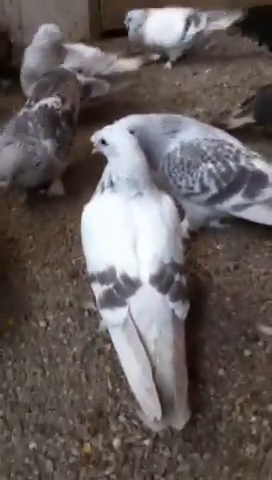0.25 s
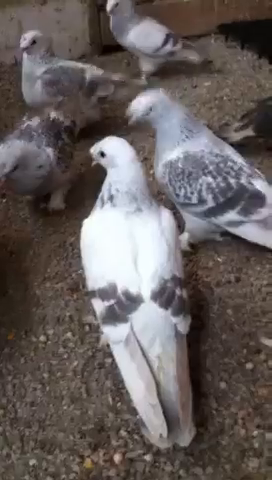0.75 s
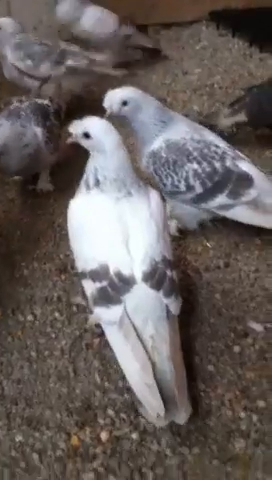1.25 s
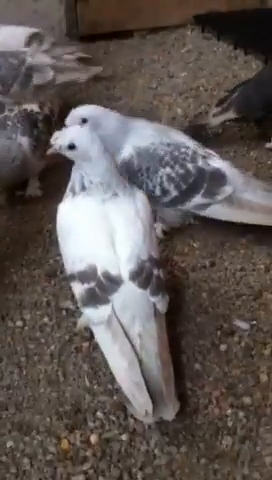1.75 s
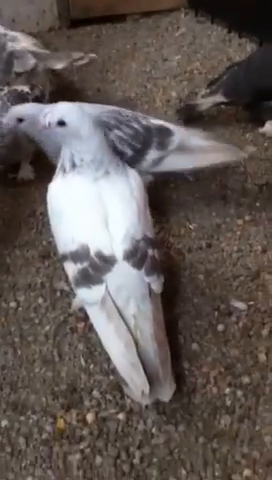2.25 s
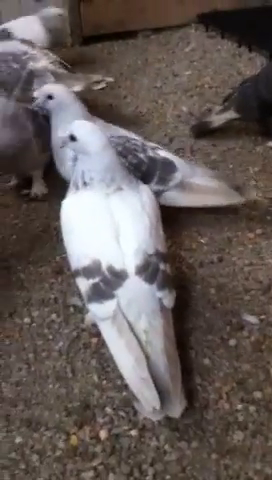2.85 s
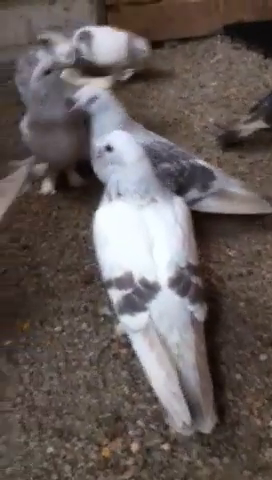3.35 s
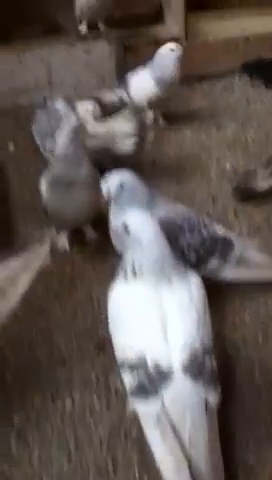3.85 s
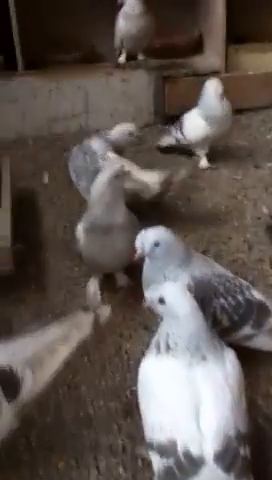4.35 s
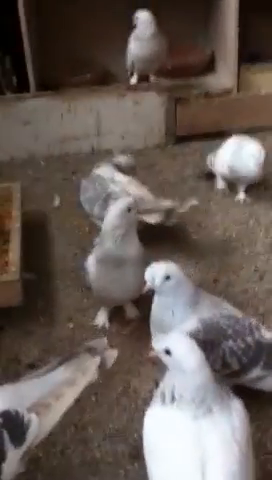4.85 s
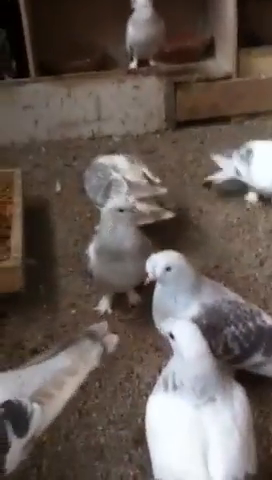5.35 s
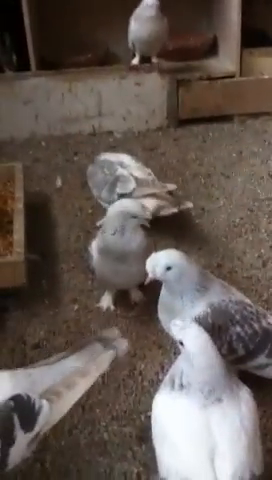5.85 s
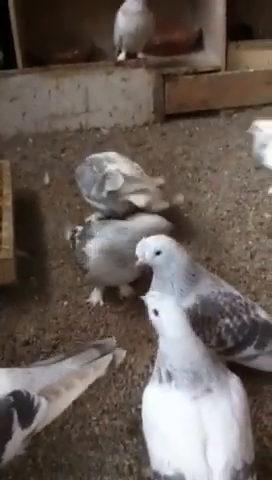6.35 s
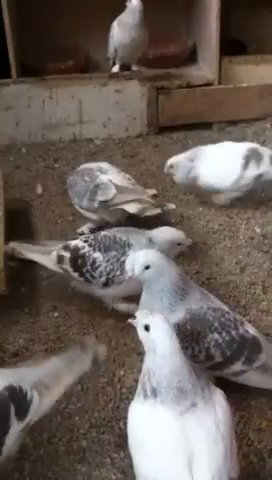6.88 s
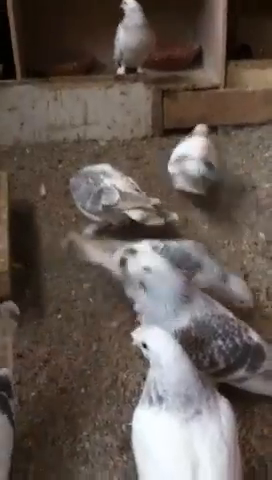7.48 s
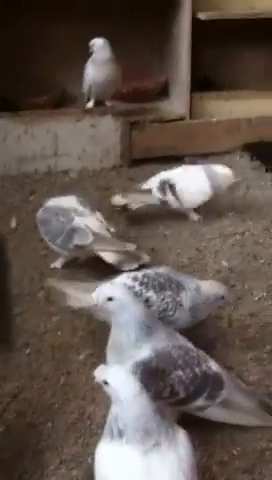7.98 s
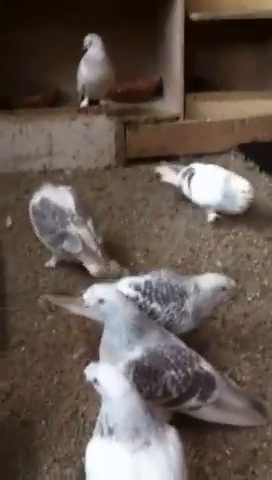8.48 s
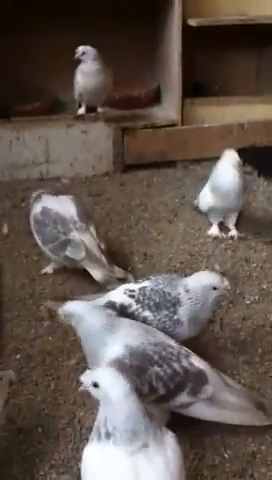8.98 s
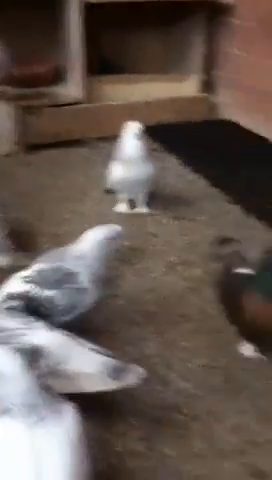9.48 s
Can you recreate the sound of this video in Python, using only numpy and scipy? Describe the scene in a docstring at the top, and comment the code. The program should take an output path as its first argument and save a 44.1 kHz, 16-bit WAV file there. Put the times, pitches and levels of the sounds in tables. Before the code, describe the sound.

A pigeon's low hum, around 200 Hz with a stronger octave above, is already sounding at the start and swells until 0.45 s. From 0.53 to 1.24 s one bird claps its wings seven times, evenly, about nine a second: loud, dry, crackling slaps with soft thumps and brief board echoes, amid feather swish. Quiet pops, clucks and faint metal ticks follow from 1.4 s, leading to a hum at 2.1-2.7 s, more bubbling, and another hum at 3.4-3.9 s. A lull until 5.2 s holds only small grit ticks and a faint feather brush. Rolling resumes, with a short hum and faint hoarse croak near 5.9 s, then stronger, rougher, gulping coos at 6.1-6.5, 7.1-7.7 and 8.4-9.0 s, joined by throat pops and clucks between. Feather rustle and a few ticks end it over a quiet, patchy wash.

```python
"""Pigeons coo in a wooden loft: rolls of short throat pops swell into long hummed notes that turn rough.
The hum is a few sine harmonics with half lines between them; pops, clucks and a croak are short rings and noise.
One bird claps its wings seven times, made of noise and clusters of snaps with a soft thump ahead of each.
Feet, beaks and feathers tick and rustle on grit and a metal tray, as coloured snaps, hiss and ringing modes.
A quiet, patchy wash of noise lies behind it all, and echoes off the boards follow most of the sounds."""
import sys
import numpy as np
from scipy import signal
from scipy.io import wavfile
from scipy.ndimage import uniform_filter1d

SR = 44100
rng = np.random.default_rng(int(sys.argv[2]) if len(sys.argv) > 2 else 0)


def waveform_to_disk(signal):
    """Save audio, clipped to [-1, 1], as 16-bit WAV at the path in sys.argv[1]."""
    frames = np.transpose(np.atleast_2d(signal))
    scaled = np.clip(frames, -1, 1) * 32767
    samples = np.round(scaled).astype(np.int16)
    wavfile.write(sys.argv[1], SR, samples)


def decibels_to_gain(level_db):
    """Convert a level in decibels to a linear amplitude gain (20 dB per decade)."""
    exponent = np.asarray(level_db, float) / 20
    return 10 ** exponent


N = 428652
CHEST_HZ = 223.9  # the pitch at which the chest sounds strongest


def evened(x):
    """Scales to rms 1."""
    return x / np.sqrt(np.mean(x ** 2) + 1e-20)


def read(points, hz):
    """Reads a table on a log-frequency axis."""
    f, value = np.transpose(points)
    return np.interp(np.log(hz + 1), np.log(f + 1), value)


def add(mix, s, sound):
    """Mixes a sound in at time s."""
    part = mix[max(round(s * SR), 0):][:len(sound)]
    part += sound[:len(part)]


def colour(x, spectrum, tilt_db=0):
    """Causal filter of energy 1 with the given spectrum, tilted about 4 kHz by dB per octave above 800 Hz."""
    hz = abs(np.fft.fftfreq(2048, 1 / SR))
    octaves = np.log2(np.maximum(hz, 800) / 4000)
    log_gain = np.log(decibels_to_gain(np.maximum(read(spectrum, hz) + tilt_db * octaves, -100)))
    # the phase that goes with this gain puts the energy as early as possible
    response = np.exp(np.conj(signal.hilbert(log_gain)))
    taps = np.fft.ifft(response).real[:1024]
    return signal.oaconvolve(x, taps / np.linalg.norm(taps))


def wander(size, s):
    """Random curve of rms 1, smoothed twice over s seconds."""
    width = max(round(s * SR), 1)
    smooth = uniform_filter1d(rng.standard_normal(size), width)
    return evened(uniform_filter1d(smooth, width))


def puff(t, rise_s, fall_s):
    """Soft rise, exponential fall, top near 1."""
    t = np.maximum(t, 0)
    shape = (1 - np.exp(-(t / rise_s) ** 2)) * np.exp(-t / fall_s)
    return shape / (shape.max() + 1e-9)


def along(tables, column=1, quiet=-110):
    """Joins curve tables over the whole time, with the quiet value between them."""
    t, out = np.arange(N) / SR, np.full(N, float(quiet))
    for rows in tables:
        rows = np.array(rows)
        inside = (t >= rows[0, 0]) & (t < rows[-1, 0])
        out[inside] = np.interp(t[inside], rows[:, 0], rows[:, column])
    return out


def crackle(spread_s, rise_s, per_s):
    """A cluster of snaps of uneven size that gathers fast and thins out."""
    t = np.arange(1, 2600) / SR
    draws = rng.random((len(t), 3))
    happens = draws[:, 0] < per_s / SR
    snaps = happens * np.sign(draws[:, 1] - .5) * -np.log(draws[:, 2] + 1e-2)
    gather = 1 - 0.85 * np.exp(-t / rise_s)
    fade = np.exp(-(t / max(spread_s, .001)) ** 2.1)
    return snaps * gather * fade


def loft(x, level_db):
    """Direct sound plus sparse reflections off the boards, each band dying at its own speed."""
    # how long the loft rings: (f/Hz, time to fall by 60 dB/s)
    ringing = [(100, 0.1), (400, 0.3), (1500, 0.21), (5000, 0.14), (15000, 0.054)]
    taps = np.zeros(SR // 2)
    at = np.arange(120, len(taps) - 20, 12)
    taps[at + rng.integers(0, 12, len(at))] = rng.choice([-1., 1.], len(at))
    hz, t, z = signal.stft(taps, SR, nperseg=256)
    fading = z * decibels_to_gain(-60 * t / read(ringing, hz)[:, None])
    tail = signal.istft(fading, SR, nperseg=256)[1]
    heard = decibels_to_gain(level_db) * signal.fftconvolve(x, tail / np.linalg.norm(tail))
    add(heard, 0, x)
    return heard[:N]


def air():
    """Distant outdoor wash and microphone hiss, slightly patchy: noise shaped in frequency and time."""
    # colour of the wash: (f/Hz, relative level per Hz/dB)
    wash = [(15, -46.5), (25, -11), (48, -37.5), (118, -2), (220, 0.5), (457, -5.5), (1060, -6),
            (2460, -21), (5570, -22.5), (10700, -26.5), (15200, -29), (16500, -37)]
    frames, hz = N // 256 + 5, np.fft.rfftfreq(1024, 1 / SR)
    a, b, patches = rng.standard_normal((frames, 513, 3)).T
    patches = evened(uniform_filter1d(uniform_filter1d(patches, 12, 0), 14, 1))  # rms 1 dB
    z = (a + 1j * b) * decibels_to_gain(read(wash, hz)[:, None] + patches)
    noise = signal.istft(z, nperseg=1024, noverlap=768)[1][:N]
    return decibels_to_gain(-56.5) * evened(noise)


def rustle():
    """Slightly grainy feather hiss, blended between a broad swish and a thin rasp."""
    # feathers brushing, one curve a rustle: (t/s, level/dB, share of the thin rasp 0-1)
    brushes = [
        [(0.415, -40.5, 0.02), (1.001, -32, 0.07), (1.42, -53, 0.14)],
        [(2.72, -69, 0.35), (2.738, -51, 0.2), (2.87, -63, 0.56)],
        [(5.03, -64, 0.5), (5.138, -51.5, 0.63), (5.3, -64, 0.45)],
        [(7.24, -52, 0.79), (7.428, -67.5, 0.6), (7.45, -67.5, 0.5)],
        [(7.66, -52, 0.44), (7.83, -59, 0.13), (7.9, -62.5, 0.3)],
        [(9.26, -70.5, 0.4), (9.29, -48, 0.03), (9.54, -61.5, 0.5)],
    ]
    # colour of whole wings swishing: (f/Hz, relative level per Hz/dB)
    wing_colour = [(120, -35), (200, -4.5), (394, 0), (548, -1.5), (749, -7), (8900, -24), (16000, -28.5)]
    # colour of quills rasping: (f/Hz, relative level per Hz/dB)
    quill_colour = [(1060, -40.5), (1800, -2.5), (4170, -2), (6590, -12.5), (13200, -15.5), (16000, -17.5)]
    grains = rng.standard_normal(N) * decibels_to_gain(1.5 * wander(N, .006))
    share = np.clip(along(brushes, column=2, quiet=0), 0, 1)
    swish = evened(colour(grains, wing_colour)[:N])
    rasp = evened(colour(grains, quill_colour)[:N])
    level = uniform_filter1d(decibels_to_gain(along(brushes)), 600)
    return ((1 - share) * swish + share * rasp) * level


def ticks(count=20):
    """Claws and beaks shift a few grains of grit, each tick a burst of snaps; faint far ones fall at random."""
    # the clearest steps and pecks on the grit: (t/s, level near the peak/dB, tilt/dB per octave)
    steps = [(0.1918, -42.5, 1.5), (0.2858, -43.5, -4), (0.425, -30.5, 2), (0.947, -25.5, 11),
             (1.4383, -37.5, 0.7), (1.5268, -42.5, 0.1), (2.1924, -46, 0), (2.391, -49, -10.5),
             (2.7322, -45.5, -3), (3.1702, -45.5, 1), (4.0188, -48, 5), (4.3151, -47, -1),
             (4.5042, -51, -1), (4.595, -40.5, 3), (5.306, -44.5, 2), (5.3487, -46, -2),
             (5.5532, -45, -2.5), (5.893, -47, -10.5), (6.2615, -34.5, 1.3), (6.4884, -48.5, 0),
             (6.592, -34.5, -3), (7.0258, -47, 0), (7.232, -39.5, -4), (7.2626, -44.5, 3),
             (7.34, -47.5, -3), (7.5206, -41, -0.5), (7.633, -41, -1.5), (7.7033, -41.5, 0.1),
             (8.36, -54.5, -6.5), (9.282, -38.5, -3.5), (9.365, -45.5, -13.5), (9.394, -48, -1.5),
             (9.663, -35, 13.5)]
    # colour of the grit: (f/Hz, relative level per Hz/dB)
    grit = [(530, -32.5), (900, -6.5), (3130, -4), (5170, -2.5), (9400, -8), (14800, -19.5), (16100, -24.5),
            (16700, -61)]
    out = np.zeros(N)
    when = rng.random(count) * N / SR
    size, tilt = rng.standard_normal((count, 2)).T
    faint = zip(when, -55.5 + size, 5.5 + 5 * tilt)  # same columns as the steps
    for s, db, tilt_db in steps + list(faint):
        tick = colour(crackle(.007, 0.00074, per_s=6100), grit, tilt_db)
        add(out, s, decibels_to_gain(db) * tick / np.percentile(abs(tick[:400]), 99))
    return out


def tray():
    """A beak or claw brushes a thin metal tray: a scraping touch sets a few of its modes ringing."""
    # touches of the tray: (t/s, peak level/dB)
    taps = [(1.4387, -50), (1.4686, -47), (1.5299, -51), (2.1916, -51), (2.2248, -62), (2.9113, -53.5),
            (3.171, -53)]
    # ringing modes of the tray: (f/Hz, relative level/dB, time to fall by 60 dB/s)
    modes = [(2380, -5, .02), (2860, -2, .025), (4170, 0, .02), (4330, -3, .02), (5960, -7, .018)]
    out, t = np.zeros(N), np.arange(6000) / SR
    ring = sum(decibels_to_gain(db - 60 * t / t60) * np.sin(2 * np.pi * hz * t) for hz, db, t60 in modes)
    for s, db in taps:
        tap = signal.fftconvolve(crackle(.012, 0.0019, per_s=3300), ring)
        add(out, s, decibels_to_gain(db) * tap / abs(tap).max())
    return out


def wings():
    """Feathers slap one after another; pushed air thumps just before; the bird moves, so the echoes change."""
    # wing claps: (t/s, level of the slap near its peak/dB, basic spread of the slaps/s, tilt/dB per octave)
    claps = [(0.5347, -4.5, 0.011, 0.6), (0.6496, -5, 0.0087, -0.3), (0.7613, -2.5, 0.009, 0.34),
             (0.876, -6.5, 0.0068, 0.1), (0.9916, -3, 0.0083, 0.86), (1.112, -5, 0.0094, 1.44),
             (1.2371, -8, 0.0084, 0.9)]
    # colour of a slap: (f/Hz, relative level per Hz/dB)
    slap_colour = [(35, -46), (60, -17.5), (477, -2), (1870, -3), (2050, -3), (3210, -2.5), (4790, -5.5),
                   (13200, -11), (15600, -17.5), (16700, -35.5)]
    out, t = np.zeros(N), np.arange(3000) / SR
    for s, db, spread, tilt_db in claps:
        # air squeezed out between the wings
        rush = 0.28 * rng.standard_normal(2599) * puff(t[:2599], .4 * spread, 0.011)
        snaps = crackle(1.25 * spread, 0.5 * spread, per_s=5000)
        slap = colour(snaps + rush, slap_colour, tilt_db)
        slap = decibels_to_gain(db) * slap / np.percentile(abs(slap[:600]), 99.5)
        add(out, s - .002, loft(slap, -4.5))
        # the hollow between the closing wings
        hollow_hz = 310 * rng.uniform(.93, 1.07)
        hollow = np.sin(2 * np.pi * hollow_hz * t) * puff(t, 0.0042, 0.012)
        add(out, s - .01, decibels_to_gain(db - 20) * hollow)
        thump = wander(len(t), 0.001) * puff(t, 0.011, 0.0027)
        add(out, s - .012, decibels_to_gain(db - 30) * thump)
    return out


def croak():
    """A hoarse breathy rasp from one throat: uneven puffs of noise through a wide resonance."""
    out, size = np.zeros(N), round(0.116 * SR)
    puffs = rng.standard_normal(size) * decibels_to_gain(4.0 * wander(size, 0.0031))
    band = signal.butter(2, [0.57 * 1500, 1.06 * 1500], "band", fs=SR, output="sos")
    rasp = evened(signal.sosfilt(band, puffs))
    shape = puff(np.arange(size) / SR, .02, 0.043) * signal.windows.tukey(size, .1)
    add(out, 5.92, decibels_to_gain(-56) * rasp * shape)
    return out


def clucks():
    """Short hoarse tones that slide up through their pitch, with a lower side tone."""
    # higher rising clucks of a second bird: (t/s, level of the main tone/dB, pitch the slide passes/Hz)
    calls = [(0.042, -32.5, 537), (1.47, -46, 743), (1.888, -45, 604), (2.233, -32, 492), (2.344, -38, 497),
             (2.379, -43, 789), (2.676, -43, 744), (2.743, -41, 619.6), (2.807, -37, 592),
             (2.968, -44.5, 522), (3.119, -41.5, 531), (3.147, -43, 683), (3.374, -40.5, 555),
             (5.24, -55, 610), (5.602, -43.5, 557.4), (5.619, -39, 632), (5.775, -45.5, 650),
             (6.029, -43.5, 508.5), (6.558, -44, 536), (6.588, -37.5, 623), (6.91, -45.5, 561),
             (7.775, -44, 508), (7.825, -37, 592), (8.134, -42.5, 621)]
    out, t = np.zeros(N), np.arange(0, .15, 1 / SR)
    for s, db, hz in calls:
        length = .034 - .001 * (db + 43)  # a harder cluck is shorter
        slide = 1.1 - 0.34 * np.exp(-t / 0.018) + 0.06 * np.tanh(wander(len(t), 0.003))
        turns = hz * np.cumsum(slide) / SR
        tone = np.sin(2 * np.pi * turns) + decibels_to_gain(-11) * np.sin(2 * np.pi * .8 * turns)
        tone *= decibels_to_gain(4 * np.tanh(wander(len(t), .004)))  # hoarseness
        add(out, s - .008, decibels_to_gain(db) * tone * puff(t, 0.3 * length, 0.5 * length))
    return out


def murmur():
    """Many faint, blurred pops at random moments, each ringing the throat and chest bands unevenly."""
    # the pops of the roll between notes, one curve a roll: (t/s, level/dB, lift of the chest bands/dB)
    rolls = [
        [(0.0, -40.5, 3), (0.08, -48, -2)],
        [(1.4, -61, 9), (1.8, -53, 8), (2.12, -48, 5), (2.4, -47.5, 6)],
        [(2.66, -47, 15), (2.934, -51.5, 5), (3.28, -45, 9.5), (3.46, -43, 3)],
        [(5.228, -51, 3), (5.5, -52.5, 1), (6.15, -39.5, -10)],
        [(6.48, -43, 2), (6.824, -46.5, -6.5), (7.15, -46, -6.5)],
        [(7.66, -55, 1), (7.892, -49.5, 5), (8.4, -46, -5)],
    ]
    # bands that ring: (f/Hz, width/Hz, relative level/dB)
    bands = [(312.5, 15, -2.5), (390, 70, 2.5), (225, 13, -9), (175, 30, -17.5), (499, 140, -10.5)]
    throat, chest, t = np.zeros(N), np.zeros(N), np.arange(3000) / SR
    for detune in np.linspace(-1, 1, num=3):
        moments = (rng.random(N) < 24 / SR) * decibels_to_gain(2.1 * rng.standard_normal(N))  # about 24 a second
        for hz, width, db in bands:
            hits = moments * decibels_to_gain(2.8 * rng.standard_normal(N)) * rng.choice([-1., 1.], N)
            ring = np.sin(2 * np.pi * (hz + detune * width / 2) * t) * puff(t, 0.011, 0.017)
            place = chest if hz < CHEST_HZ + width else throat
            add(place, 0, decibels_to_gain(db) * signal.oaconvolve(hits, ring))
    lift = uniform_filter1d(decibels_to_gain(along(rolls, column=2, quiet=0)), 800)
    level = uniform_filter1d(decibels_to_gain(along(rolls)), 400)
    return evened(throat + lift * chest) * level


def roll():
    """Each pop rings the throat briefly, with a chest tone below and a faint side tone."""
    # the clearest throat pops of the roll between notes: (t/s, level of the throat ring/dB, starting f/Hz)
    pops = [(0.045, -36.5, 310), (1.862, -42, 409), (2.012, -39, 324), (2.12, -35.5, 426), (2.97, -40, 316),
            (3.075, -36, 390), (3.192, -37.5, 360), (3.284, -36.5, 378.4), (3.339, -39.5, 398),
            (3.408, -40, 329), (5.236, -48, 376), (5.291, -41, 356), (5.43, -46, 390), (5.558, -34.5, 390),
            (5.677, -39.5, 370), (5.727, -37.5, 379.5), (5.825, -44, 397), (6.029, -36, 373),
            (6.072, -36, 351), (6.121, -34, 347), (6.643, -36, 329), (6.862, -32.5, 373), (6.989, -38, 361),
            (7.035, -34, 375), (7.078, -37, 367.6), (7.102, -36.5, 390), (7.884, -38, 321),
            (8.062, -35, 377), (8.199, -39, 358), (8.252, -36, 373), (8.286, -36.5, 383.5),
            (8.315, -34, 369)]
    out, t = np.zeros(N), np.arange(5000) / SR
    for (s, db, hz), chance in zip(pops, rng.random((len(pops), 4))):
        turns = hz * (t - 0.17 * t ** 2)  # the pitch sinks a little
        ring = np.sin(2 * np.pi * (turns + chance[0]))
        ring += decibels_to_gain(-12.5 + 3.3 * chance[3]) * np.sin(2 * np.pi * (CHEST_HZ * t + chance[1]))
        ring += decibels_to_gain(-16) * np.sin(2 * np.pi * (1.3 * turns + chance[2]))
        add(out, s - .008, decibels_to_gain(db) * ring * puff(t, rise_s=.012, fall_s=.012))
    return out


def notes():
    """Closed-beak hum: the swollen throat favours harmonic 2; strong-weak cycles add half lines."""
    # one curve a hummed note: (t/s, pitch f/Hz, harmonic 2 level/dB, half lines against harmonic 2/dB)
    hums = [
        [(0.0, 222.3, -41.5, -15), (0.04, 222, -50, -15), (0.06, 195.5, -48, 3), (0.1, 202.4, -32.5, -38),
         (0.2, 196.1, -35, -25), (0.24, 206, -38.5, -22), (0.35, 202.1, -33.5, -22), (0.4, 236.2, -37.5, -4),
         (0.45, 245.4, -41, 3)],
        [(2.11, 208.4, -49.5, -15), (2.17, 231.4, -48, -20), (2.25, 218.5, -43.5, -12),
         (2.35, 217.3, -38.5, -9.5), (2.39, 204, -34.5, -17), (2.47, 200.9, -35.5, -36),
         (2.56, 218.8, -35, -15), (2.61, 200.5, -26, -33), (2.65, 197.4, -33, -22), (2.7, 202.7, -34.5, -22),
         (2.73, 197.1, -49, 0)],
        [(3.44, 187.3, -50, -0.5), (3.5, 200.4, -38.5, -38), (3.6, 182, -41, -35), (3.64, 220.8, -34.5, -21.5),
         (3.7, 225, -38, -14.5), (3.76, 216.3, -31.5, -12), (3.85, 221.5, -32, -13.5), (3.89, 207.2, -46, -2),
         (3.92, 195.3, -40.5, -22.5)],
        [(5.87, 198.1, -42, -25), (5.91, 214.6, -36.5, -16), (5.95, 216.7, -53, -9), (5.99, 216.5, -36, -37),
         (6.02, 216.2, -43, 5)],
        [(6.13, 170.3, -43, -19), (6.18, 181.6, -32.5, -35), (6.24, 187.9, -33, -32), (6.29, 208.6, -37, -20),
         (6.33, 206.3, -30, -19), (6.38, 211.7, -31.5, -10), (6.43, 221, -28, -2.5), (6.47, 211.3, -31, -11.5),
         (6.5, 200.6, -42, -15)],
        [(7.13, 195.8, -35.5, -9), (7.23, 204.1, -41.5, -32), (7.34, 180.6, -31.5, -48.5),
         (7.39, 187.3, -32, -42), (7.42, 209.3, -40, -25), (7.46, 220.1, -33.5, -22), (7.57, 224.5, -30, -7),
         (7.65, 196.8, -31.5, -15.5), (7.7, 192.1, -52, -18)],
        [(8.39, 200.9, -52, -12.5), (8.44, 198, -33, -14), (8.47, 197, -37.5, -5), (8.5, 188, -34.5, -16),
         (8.54, 177.2, -37.5, -44), (8.61, 185.2, -32.5, -37), (8.65, 214.4, -38, -20), (8.77, 216.4, -31, -22),
         (8.84, 222, -36.5, -4.5), (8.9, 185.3, -32.5, -20.5), (8.97, 193.5, -49.5, -9.5)],
    ]
    # gulps that swell a hummed note: (t/s, peak level/dB)
    gulps = [(0.243, -31.5), (0.285, -24.5), (0.332, -25), (2.154, -37), (2.285, -39), (2.388, -35),
             (2.544, -34), (2.609, -32), (2.702, -29.5), (3.543, -35), (3.676, -32), (3.759, -30),
             (3.865, -29.5), (3.904, -33.5), (5.895, -30.5), (5.968, -34), (6.312, -25.5), (6.35, -37),
             (6.438, -31), (6.461, -28.5), (7.142, -36), (7.265, -26.5), (7.307, -32), (7.433, -30.5),
             (7.559, -33.5), (7.584, -30), (7.614, -24.5), (7.636, -31), (8.457, -31), (8.571, -30.5),
             (8.639, -33), (8.7, -32), (8.747, -34), (8.822, -33.5), (8.853, -26), (8.88, -27.5),
             (8.924, -46)]
    t = np.arange(N) / SR
    s, hz, level_db, rough_db = np.transpose(np.vstack(hums))
    hz, level_db, rough_db = (np.interp(t, s, v) for v in (hz, level_db, rough_db))
    sounding = sum((t >= rows[0][0]) & (t < rows[-1][0]) for rows in hums)
    sounding = uniform_filter1d(sounding * 1., round(0.017 * SR))  # soft starts and ends
    turns = np.cumsum(hz * (1 + .003 * wander(N, 0.0052))) / SR
    second = np.sqrt(2) * decibels_to_gain(level_db + .8 * wander(N, .015))  # uneven breath inside a note
    # harmonic 1 weakens as the voice sinks below the chest pitch
    first = second * decibels_to_gain(-12 - 0.6 * np.maximum(CHEST_HZ - hz, 0))
    half = second * decibels_to_gain(rough_db)
    swell, choke = np.zeros((2, N))
    for at, db in gulps:
        add(swell, at - .008, decibels_to_gain(db) * puff(t[:4000], rise_s=.012, fall_s=0.0095))
        add(choke, at - .02, 0.75 * signal.windows.hann(round(.025 * SR)))
    # the throat narrows, then the gulp bursts through
    push = np.hypot(1 - np.clip(choke, 0, 1), swell / second)
    flutter = decibels_to_gain(3.3 * wander(N, 0.01))  # the half lines and harmonic 3 come and go
    voice = first * np.sin(2 * np.pi * turns)
    third = decibels_to_gain(-26.5) * flutter * np.sin(6 * np.pi * turns)
    voice += second * push * (np.sin(4 * np.pi * turns) + third)
    # the strong-weak pattern keeps losing its step, which blurs the half lines
    slip = .9 * wander(N, .012)
    lines = np.sin(3 * np.pi * turns + slip) + decibels_to_gain(-11.5) * np.sin(5 * np.pi * turns - slip)
    voice += half * push ** 0.5 * flutter * lines
    return voice * sounding


def scene():
    """All birds in the loft over the background."""
    hum = loft(notes(), -13)
    calls = loft(roll() + clucks() + croak() + murmur(), -6.5)
    floor = loft(ticks() + tray(), 1.7)
    return (hum + calls + wings() + floor + rustle() + air())[None]


def roll_off(x):
    """The treble ends steeply here."""
    return signal.sosfilt(signal.butter(12, 17000, fs=SR, output="sos"), x)


def record(dry):
    """A small microphone loses the deep bass and rounds the loudest peaks."""
    thin = signal.sosfilt(signal.butter(1, 75, "high", fs=SR, output="sos"), dry)
    rounded = .8 * np.tanh(thin / .8)
    return roll_off(rounded)


dry = scene()
out = record(dry)
waveform_to_disk(out)
```